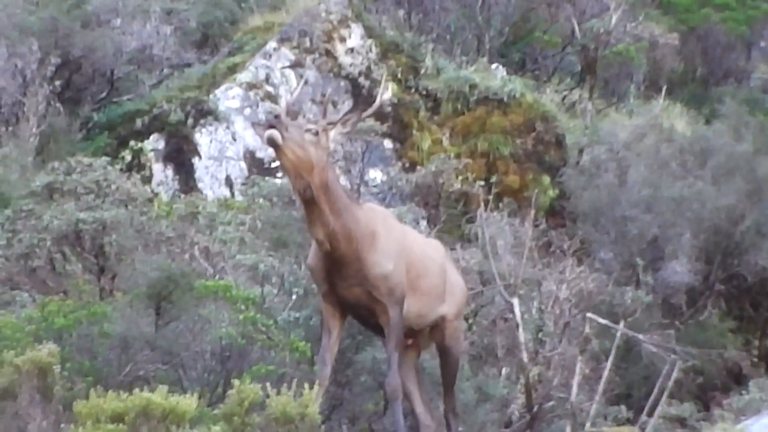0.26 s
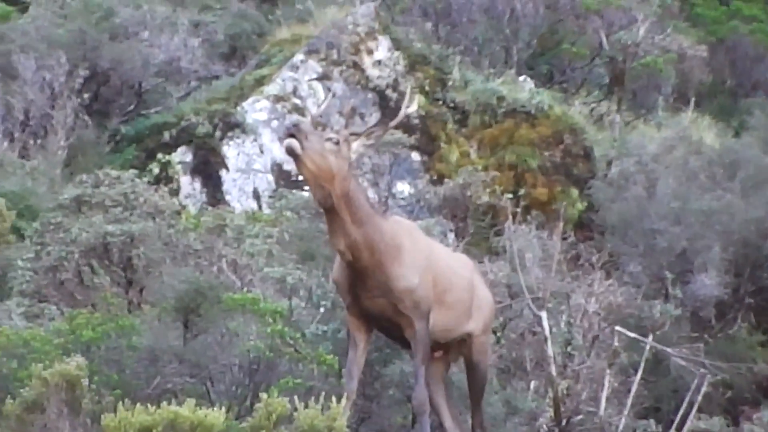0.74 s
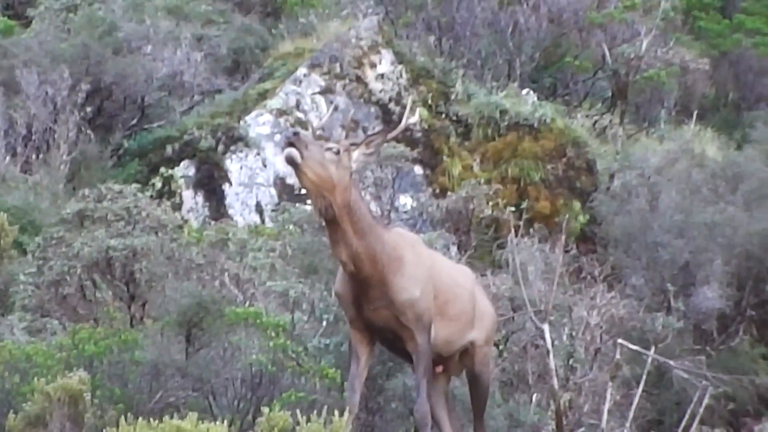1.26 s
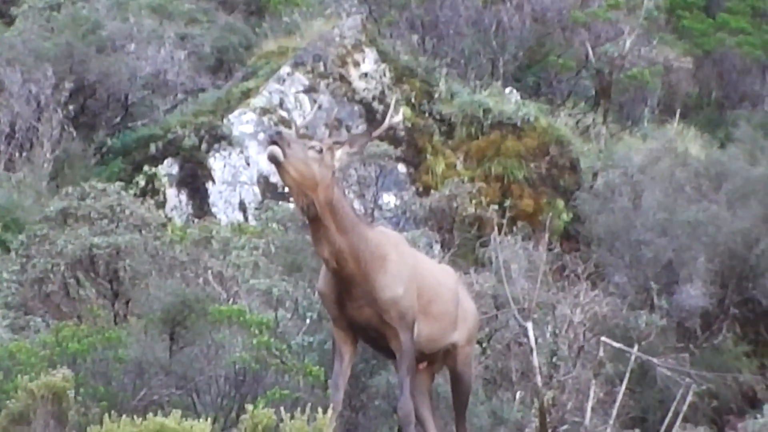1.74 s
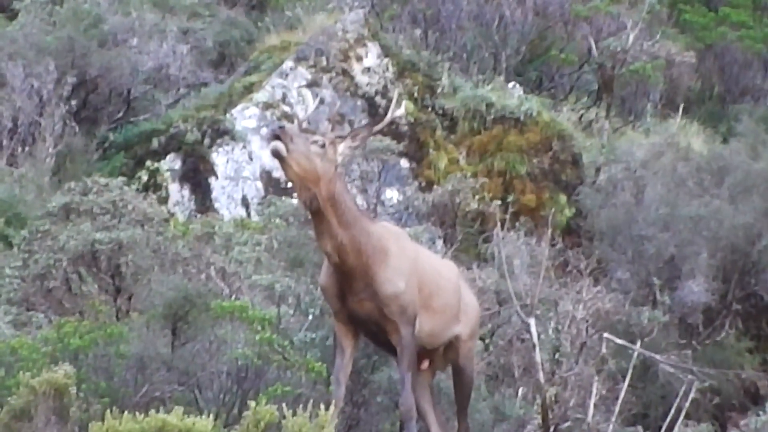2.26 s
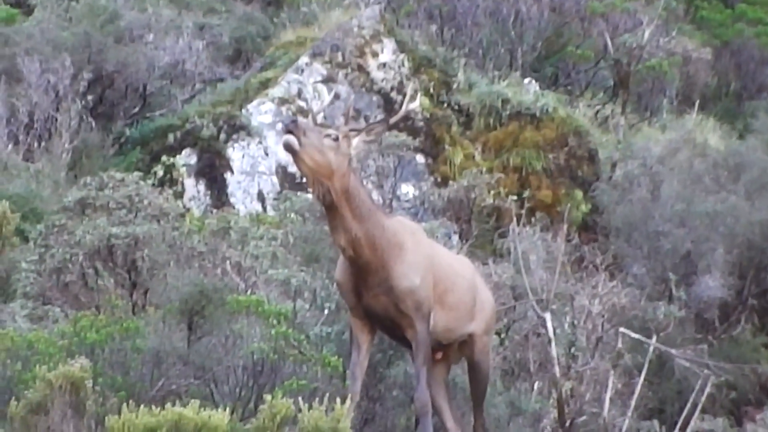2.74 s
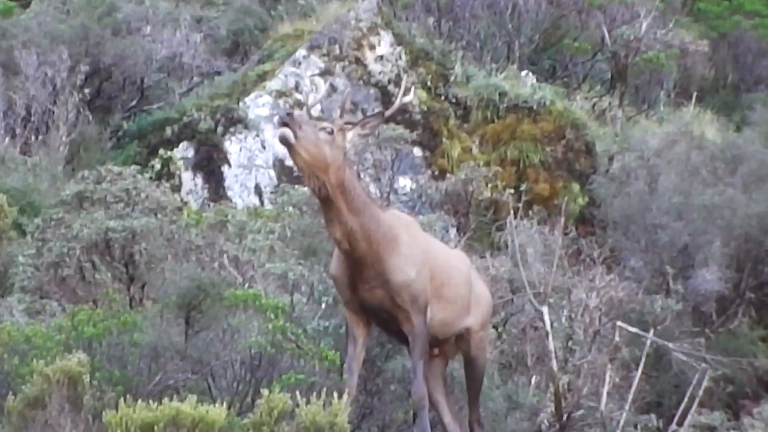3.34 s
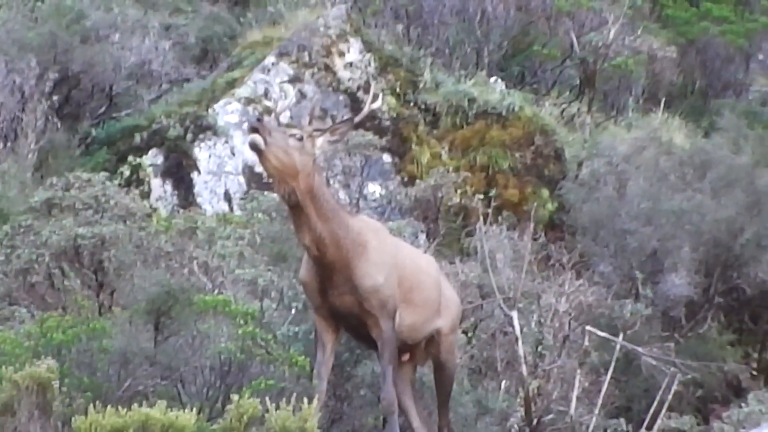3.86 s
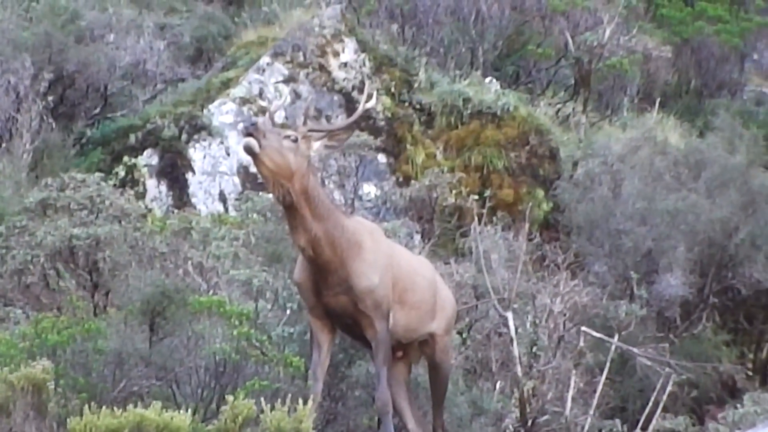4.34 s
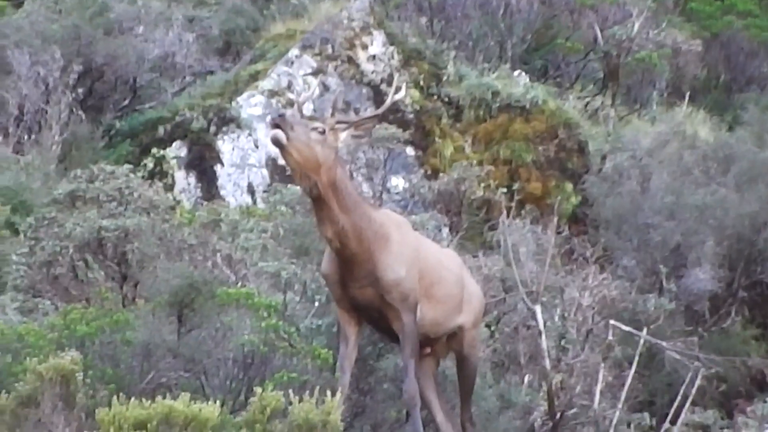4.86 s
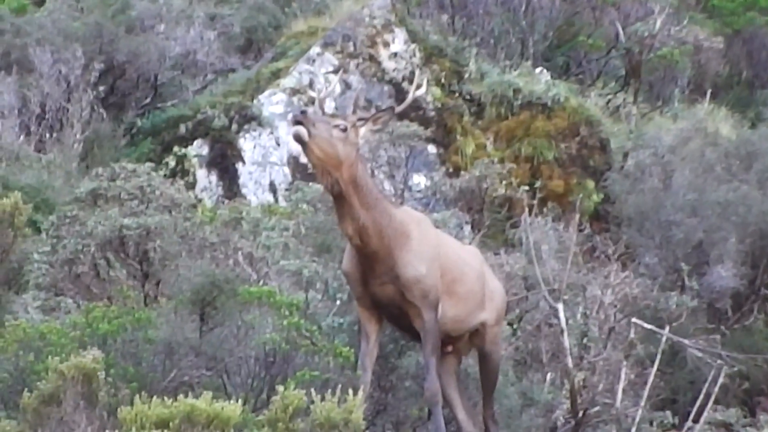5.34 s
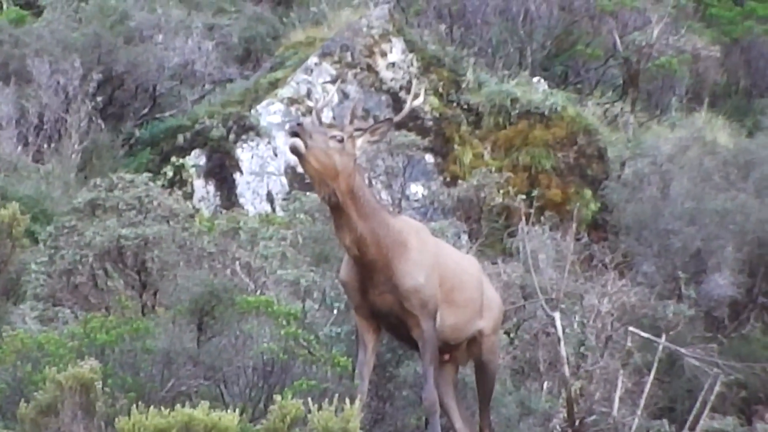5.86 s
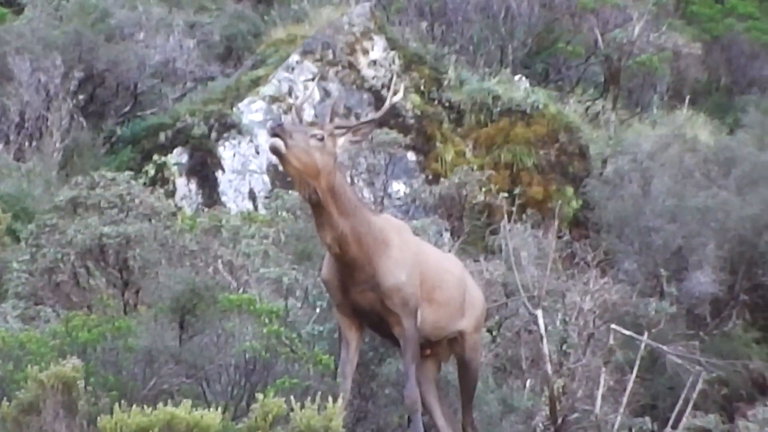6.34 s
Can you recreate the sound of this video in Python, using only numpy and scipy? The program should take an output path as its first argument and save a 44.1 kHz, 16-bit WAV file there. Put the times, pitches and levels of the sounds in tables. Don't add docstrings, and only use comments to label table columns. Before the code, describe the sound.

A big stag calls on an open scrub hillside. Quick hoarse grunts, about three a second, alternate with rasping in-breaths, then a louder, longer roar with a wavering whistle breaks out. More grunts lead to a second roar, a few weaker grunts, and a third roar cut off at the end. Soft echoes return from the slope over faint wind, distant water and hiss; a hand lightly bumps the microphone.

```python
import sys
import numpy as np
from scipy import signal
from scipy.fft import rfft, irfft, next_fast_len
from scipy.io import wavfile
from scipy.ndimage import uniform_filter1d

SR = 44100
rng = np.random.default_rng(int(sys.argv[2]) if len(sys.argv) > 2 else 0)


def magnitude_from_level(level_db):
    exponent = np.asarray(level_db, float) / 20
    return 10 ** exponent


def log_audio(samples):
    frames = np.atleast_2d(samples).T
    limited = np.clip(frames, -1, 1)
    pcm = np.round(limited * 32767).astype(np.int16)
    wavfile.write(sys.argv[1], SR, pcm)


N = 291060


def evened(x):
    return x / np.sqrt(np.mean(x ** 2) + 1e-20)


def steadied(x):
    swing = np.sqrt(uniform_filter1d(x ** 2, 1300) + 1e-3)
    return evened(x / swing ** .75)


def read(points, hz):
    f, value = np.transpose(points)
    return np.interp(np.log(hz + 1), np.log(f + 1), value)


def over_time(points):
    s, *columns = np.transpose(points)
    return [np.interp(np.arange(N) / SR, s, c) for c in columns]


def wander(hz):
    smooth = signal.butter(2, hz, fs=SR, output="sos")
    return evened(signal.sosfilt(smooth, rng.standard_normal(N)))


def spread(tables):
    gate = np.zeros(N)
    for rows in tables:
        gate[round(rows[0][0] * SR):round(rows[-1][0] * SR) + 300] = 1
    return uniform_filter1d(gate, 400, mode="nearest"), over_time(np.concatenate(tables))


def add(mix, s, sound):
    part = mix[round(s * SR):][:len(sound)]
    part += sound[:len(part)]


def knocks(rows, ring_s):
    out, t = np.zeros(N), np.arange(4000) / SR
    for s, db, hz in rows:
        swell = t / ring_s * np.exp(1 - t / ring_s)
        add(out, s, magnitude_from_level(db) * swell * np.sin(2 * np.pi * hz * t))
    return out


def tone(tables, overtones, unsteady, flutter_db):
    gate, (hz, level_db) = spread(tables)
    angle = 2 * np.pi * np.cumsum(hz * (1 + unsteady * wander(hz=49.0))) / SR
    wave = np.sin(angle) + sum(magnitude_from_level(db) * np.sin(k * angle) for k, db in overtones)
    return np.sqrt(2) * gate * wave * magnitude_from_level(level_db + flutter_db * wander(hz=39.34))


# pitch_hz, density_db (per Hz)
WASH_SPECTRUM = [(15, -47.5), (25, -17), (150, -9), (246, -7.5), (306, -7), (430, -1.5), (568, -22.5),
                 (721, -3.5), (796, -9.5), (1360, -13), (1500, -16.5), (2900, -43), (3770, -63),
                 (6380, -120)]
# pitch_hz, likeness (0-1)
LIKENESS = [(60, 0.2), (130, 0.22), (270, 0.87), (580, 0.89), (1220, 0.64), (2600, 0.021)]
# pitch_hz, density_db (per Hz)
HISS_SPECTRUM = [(2000, -19.5), (3000, -33), (5000, -32.5), (8000, -37), (12000, -38.5), (15700, -41.5)]


def wash():
    frames, hz = N // 256 + 5, np.fft.rfftfreq(1024, 1 / SR)
    a, b, c, d, patches = rng.standard_normal((frames, 513, 5)).T
    patches = evened(uniform_filter1d(uniform_filter1d(patches, 14, 0), 12, 1))
    same = read(LIKENESS, hz)[:, None]
    left = a + 1j * b
    z = np.array([left, same * left + np.sqrt(1 - same ** 2) * (c + 1j * d)])
    hiss = magnitude_from_level(read(HISS_SPECTRUM, hz)) * (hz > 1500)
    z *= np.hypot(magnitude_from_level(read(WASH_SPECTRUM, hz)), hiss)[:, None] * magnitude_from_level(1.8 * patches)
    breath = wander(hz=9)[np.minimum(np.arange(frames) * 256, N - 1)]
    z *= magnitude_from_level(1.3 * (hz[:, None] > 4000) * breath)
    return magnitude_from_level(-50) * evened(signal.istft(z, nperseg=1024, noverlap=768)[1][:, :N])


# pitch_hz, level_db
HUM_LINES = [(12500, -103), (15628, -91)]


def hum():
    t = np.arange(N) / SR
    return sum(np.sqrt(2) * magnitude_from_level(db) * np.sin(2 * np.pi * hz * t) for hz, db in HUM_LINES)


def folds():
    turns = np.cumsum(130 * magnitude_from_level(4.0 * wander(hz=59.56))) / SR
    slaps = np.diff(np.floor(turns), prepend=0) * magnitude_from_level(2.5 * rng.standard_normal(N))
    puffs = (.5 + np.exp(-(turns % 1) / 0.55)) * rng.standard_normal(N)
    drive = (.32 * evened(slaps) + .68 * evened(puffs)) * magnitude_from_level(2.0 * wander(hz=48.0))
    bass_cut = signal.butter(4, 120, "high", fs=SR, output="sos")
    return signal.sosfilt(bass_cut, drive)


# pitch_hz, width_hz, share_removed (0-1)
SIDE_CAVITIES = [(274, 96, 0.91), (760, 21, 0.2), (967, 200, 1), (1350, 27, 0.95), (1520, 200, 1),
                 (1998, 840, 1), (2564, 1600, 1), (4000, 200, 0.3)]


def cavity(x, modes):
    size = next_fast_len(N + SR // 2)
    hz = np.fft.rfftfreq(size, 1 / SR)
    ring = sum(magnitude_from_level(db) / (1 + 2j * (hz - f) / w) ** 2 for f, w, db in modes)
    for f, w, share in SIDE_CAVITIES:
        ring = ring * (1 - min(share, .99) / (1 + 2j * (hz - f) / w))
    return evened(irfft(rfft(x, size) * ring, size)[:N])


# pitch_hz, width_hz, level_db
LOW_MODES = [(414.4, 53.3, 4), (457, 123, -3), (607, 65, -2.5), (698.2, 50, 0), (830, 12, -11.5)]
MID_MODES = [(1004, 65, 6), (1125.5, 50, -1.5), (1183.3, 120, -2), (1350, 270, -19.5)]
MOUTH_MODES = [(1665.3, 66.4, -1.5), (1763.5, 170, 1.5), (1866, 42, -7.5)]
# pitch_hz, width_hz, level_db
CHEST_MODES = [(139, 75, -7.5), (221, 51, 0)]
NOSE_MODES = [(2200, 100, -26.5), (2329, 61, -1.5)]
LIP_MODES = [(1838, 90, 0)]
# pitch_hz, width_hz, level_db
RASP_MODES = [(3010, 150, 0), (3300, 330, -5), (3705, 210, -3.5), (4300, 120, -13)]
PIPE_MODES = [(4940, 94, 0)]
FIZZ_MODES = [(5800, 130, 2), (6280, 200, -1), (6900, 400, -4.5), (7300, 150, 0), (8100, 330, -8.5),
              (9100, 600, -8)]


def throat():
    drive = folds()
    wide = (LOW_MODES, MID_MODES, MOUTH_MODES, CHEST_MODES, NOSE_MODES, LIP_MODES)
    narrow = (RASP_MODES, PIPE_MODES, FIZZ_MODES)
    below_rasp = signal.butter(8, 2650, fs=SR, output="sos")
    rounded = signal.sosfilt(below_rasp, [steadied(cavity(drive, modes)) for modes in wide])
    return [*rounded, *(steadied(cavity(drive, modes)) for modes in narrow)]


MIDDLE_DB, MIDDLE_SHUT_DB = -4.5, -3


def shut(s, effort_db, open_depth_db, depth_db):
    shut_s, shut_db = .028, -19
    half_depth_db = (open_depth_db + depth_db) / 2 + 5
    return [(s + shut_s / 2, effort_db + shut_db / 2, half_depth_db, MIDDLE_SHUT_DB),
            (s + shut_s, effort_db + shut_db, depth_db, MIDDLE_SHUT_DB),
            (s + shut_s + 0.04, effort_db + shut_db - 10, depth_db - 5.5 - 6, MIDDLE_SHUT_DB)]


# start_s, length_s, opening_effort_db, closing_effort_db, throat_depth_db
GRUNT_ROWS = [ (.056, 0.038, -35.5, -36, 2), (0.297, 0.054, -40, -30, 3.5), (.594, 0.09, -37.5, -28.5, 4.5),
              (0.927, 0.11, -35.5, -28.5, 6), (1.264, 0.07, -40.5, -32.5, 7),
              (1.581, 0.053, -42.5, -32.5, 4), (1.895, 0.057, -36.5, -33.5, 4),
              (2.189, 0.086, -39, -32.5, 8), (3.149, 0.052, -39, -37, 6), (3.479, 0.06, -36.5, -32.5, 4),
              (3.824, 0.089, -36.5, -35.5, 6), (4.974, 0.073, -43, -38, 8.5),
              (5.399, 0.086, -44, -34.5, 5.5)]


def grunt(s, length, open_db, close_db, depth_db):
    arch_at = 0.46
    arch_db = open_db + arch_at * (close_db - open_db) + 2
    return [(s, open_db - 20.5, depth_db, MIDDLE_SHUT_DB),
            (s + 0.013, open_db, depth_db - 2.0, MIDDLE_DB),
            (s + arch_at * length, arch_db, depth_db, MIDDLE_DB),
            (s + length, close_db, depth_db, MIDDLE_DB),
            *shut(s + length, close_db, depth_db, depth_db + 5.5)]


# time_s, effort_db, throat_depth_db
LONG_ROAR_ROWS = [
    [(2.488, -63, 8), (2.499, -42, 3), (2.548, -28.5, 6), (2.588, -26, 5), (2.628, -22, -1.5),
     (2.68, -22, -9), (2.822, -22.5, 1), (2.896, -24, -3)],
    [(4.155, -55, 13.5), (4.171, -38, 3), (4.193, -30.5, 5), (4.319, -27, 5.5), (4.353, -23.5, -0.5),
     (4.42, -23, -6), (4.587, -23, -2), (4.62, -26.5, 2), (4.68, -23, -3)],
    [(5.775, -52.5, 7), (5.8, -38.5, 5.5), (5.847, -27, -0.5), (5.872, -45, 11.5), (5.88, -28, -2.5),
     (5.89, -30.5, 4)],
    [(6.095, -54, 1.5), (6.126, -36.5, 5), (6.176, -33, 8.5), (6.29, -23.5, 0), (6.422, -22, -5),
     (6.468, -24, -7.5), (6.51, -25.5, 5.5), (6.54, -22, -6), (6.62, -23, -5)],
]


def calls():
    long = [[(*row, MIDDLE_DB) for row in rows] + shut(*rows[-1], 10.5) for rows in LONG_ROAR_ROWS]
    return sorted([grunt(*row) for row in GRUNT_ROWS] + long)


# time_s, rasp_db, nose_db
STRAIN_CURVE = [(0, -6, -5), (.35, 4.5, -5.5), (.66, 3, -1.5), (1.0, 2.5, -1.5), (1.6, 1.5, 2),
                (1.95, 4.5, 4), (2.25, 4, 0.5), (2.7, -1.5, -1), (3.2, -0.5, 3.5), (3.901, 4, 1),
                (4.251, 0.5, 1), (4.65, -1, -7.5), (5.03, -7.5, 4), (5.45, 3.5, -8), (5.85, 1, -9.5),
                (6.15, 5, 0), (6.45, 2, -3), (6.6, 0.5, -4)]
# time_s, level_db
HEAD_TURN_CURVE = [(0, -7), (2.9, -6.5), (4.3, -10), (4.45, -11.5), (6.6, -16)]


def roar(cavities):
    low, mid, mouth, chest, nose, lips, rasp, pipe, fizz = cavities
    gate, (effort_db, depth_db, middle_db) = spread(calls())
    strain_db, nose_db = over_time(STRAIN_CURVE)
    head_db, = over_time(HEAD_TURN_CURVE)
    push_db = effort_db + 23.0

    mouth_share = np.sqrt(1 - magnitude_from_level(2 * middle_db))
    upper = mouth_share * (mouth + magnitude_from_level(-17.5 + 0.69 * push_db + nose_db) * nose) + magnitude_from_level(middle_db) * mid
    upper += magnitude_from_level(-16.5 + 0.58 * push_db + 1.2 * nose_db) * lips

    rasp_db = strain_db - 34.5 - 0.4 * (np.maximum(effort_db, -45) + 30.5)
    rasp_db += 3.0 * wander(hz=14)
    edge = rasp + magnitude_from_level(head_db + 2.0 + .5 * push_db) * pipe
    upper += magnitude_from_level(rasp_db - 4.5) * edge + magnitude_from_level(-45.5 + .2 * push_db + 1.1 * strain_db) * fizz

    deep = gate * magnitude_from_level(effort_db + depth_db + 0.82)
    thump = signal.lfilter([.0012], [1, -(1 - .0012)], deep ** 0.42)
    return gate * magnitude_from_level(effort_db) * upper + deep * low + magnitude_from_level(-35.5) * thump * chest


def releases():
    ends = []
    for rows in calls()[:-1]:
        deepest_db = max(row[1] + row[2] for row in rows)
        ends.append((rows[-2][0] - .012, -33 + .5 * deepest_db, 92))
    return knocks(ends, ring_s=0.0096)


# delay_s, spread_s, level_db
SLOPE_ECHOES = [(.06, 0.034, -26), (.21, 0.03, -35.5), (.4, 0.034, -42), (.7, 0.16, -45.5)]


def hillside(x):
    t = np.arange(SR) / SR
    shape = sum(magnitude_from_level(db) * np.exp(-.5 * ((t - s) / w) ** 2) / np.sqrt(w * 3500) for s, w, db in SLOPE_ECHOES)
    taps = rng.choice([-1., 1.], (3, SR)) * (rng.random((3, SR)) < 2000 / SR)
    pair = (taps[0] + taps[1:]) * shape
    dull = signal.lfilter([.3], [1, -.7], pair)
    return signal.fftconvolve(x[None], dull, axes=1)[:, :N]


# time_s, peak_db, pitch_hz
TWIG_SNAPS = [
    (0.2049, -33.5, 1370),
]


def twig():
    return knocks(TWIG_SNAPS, ring_s=0.00051)


# loudest_s, length_s, level_db, mouth_brightness_db
GASP_ROWS = [ (0.273, .07, -47.5, -6.5), (0.55, 0.069, -47, 0.5), (0.842, 0.3, -46, -5),
             (1.19, 0.21, -43, -2), (1.502, 0.13, -43, -2.5), (1.832, 0.12, -40.5, -4.5),
             (2.123, 0.1, -42, -2.5), (2.431, .14, -45, -3.5), (3.093, 0.15, -43, -4),
             (3.371, 0.14, -42.5, -8.5), (3.759, .11, -45.5, -5), (4.073, .16, -51, -0.5),
             (4.783, 0.14, -46.5, -12.5), (4.936, 0.05, -41.5, -23), (5.138, 0.078, -53, -18),
             (5.31, 0.11, -48.5, -10), (5.568, 0.033, -50, -13), (5.699, 0.062, -48, -6),
             (5.978, 0.2, -56, 0.5)]


def gasp(s, length, level_db, open_db):
    rise, edge_db = .65, level_db - 9.5
    return [(s - rise * length, edge_db, open_db), (s, level_db, open_db),
            (s + (1 - rise) * length, edge_db, open_db)]


def gasps(cavities):
    low, mid, mouth, _, _, _, rasp, _, _ = cavities
    gate, (level_db, open_db) = spread([gasp(*row) for row in GASP_ROWS])
    bright = magnitude_from_level(open_db - 5.5) * (mid + mouth + magnitude_from_level(-19.5) * rasp)
    return gate * magnitude_from_level(level_db - 2.0) * (low + bright)


# time_s, peak_db
BUMP_ROWS = [
    (1.209, -47),
    (2.318, -41),
    (2.549, -62),
    (4.029, -43),
    (5.529, -60),
]


def bumps():
    return knocks([(s, db - 0.5, 45) for s, db in BUMP_ROWS], ring_s=0.0031)


# time_s, pitch_hz, level_db
WHISTLE_ROWS = [
    [(2.575, 686, -39.5), (2.604, 695, -23), (2.68, 728, -18), (2.758, 737.7, -26.5), (2.778, 715, -20),
     (2.812, 723.5, -28.5), (2.884, 729.4, -20.5), (2.924, 725, -38.5), (3.06, 733, -51)],
    [(4.305, 640.1, -30), (4.352, 718, -21.5), (4.46, 730, -21), (4.475, 738.7, -33.5), (4.546, 717, -19),
     (4.565, 714, -33.5), (4.678, 725, -23), (4.716, 705.3, -46), (4.85, 728, -49.5)],
    [(6.2, 652.7, -31.5), (6.23, 704.3, -24.5), (6.38, 721, -19.5), (6.422, 710, -15.5), (6.442, 668, -33),
     (6.468, 738, -20.5), (6.5, 708, -30.5), (6.578, 720, -15.5), (6.6, 703, -17.5)],
]
# multiple, level_db
OVERTONES = [(2, -23), (3, -35)]


def whistle():
    return tone(WHISTLE_ROWS, OVERTONES, unsteady=.008, flutter_db=1.5)


# start_s, length_s, peak_db, pitch_hz
SQUEAK_ROWS = [
    (5.416, 0.051, -62, 2880),
    (5.455, 0.037, -64, 3260),
    (5.79, 0.038, -63, 2850),
    (5.824, 0.055, -60.5, 3750),
]


def squeaks():
    out, air = np.zeros(N), rng.standard_normal((len(SQUEAK_ROWS), 4000))
    for (s, length, db, hz), puff in zip(SQUEAK_ROWS, air):
        ring = signal.iirpeak(hz, hz / 110, SR)
        narrow = evened(signal.lfilter(*ring, signal.lfilter(*ring, puff)))[-round(length * SR):]
        add(out, s, magnitude_from_level(db) * np.hanning(len(narrow)) * narrow)
    return out


# time_s, pitch_hz, level_db
BIRD_GLIDE = [
    (5.94, 2700, -79),
    (5.974, 2570, -67),
    (6.024, 2381, -69),
    (6.032, 2380, -78),
    (6.04, 2320, -86),
]


def bird():
    return tone([BIRD_GLIDE], [], unsteady=.006, flutter_db=1.0)


def scene():
    cavities = throat()
    stag = roar(cavities) + gasps(cavities) + whistle() + releases()
    near = stag + twig() + bird()
    placed = (near + hillside(stag)) * magnitude_from_level([[-1.4], [1.3]])
    return placed + bumps() * np.array([[.3], [1.7]]) + wash() + squeaks()


def low_pass(x):
    return signal.sosfilt(signal.butter(12, 15760, fs=SR, output="sos"), x)


def record(dry):
    t = np.arange(N) / SR
    ports = np.array([dry[0], np.append(0, dry[1, :-1])])
    ports *= np.clip((N / SR - t) / .002, 0, 1)
    return low_pass(ports + hum())


dry = scene()
out = record(dry)
log_audio(out)
```